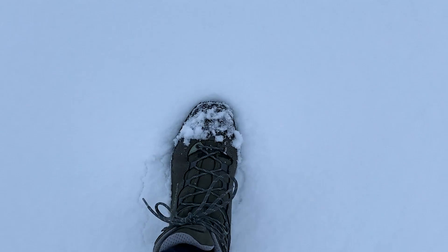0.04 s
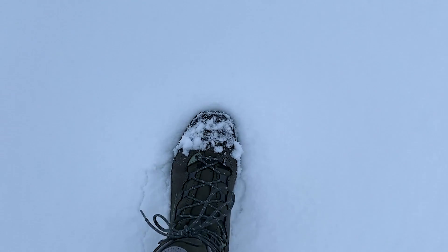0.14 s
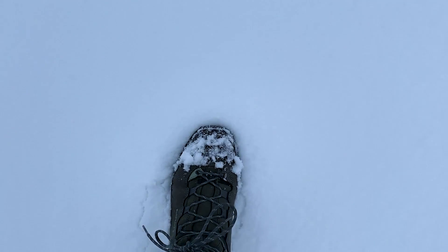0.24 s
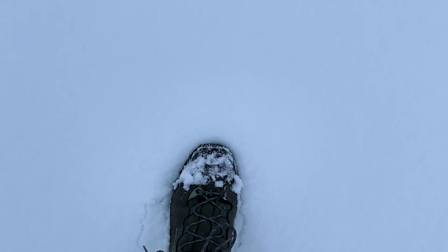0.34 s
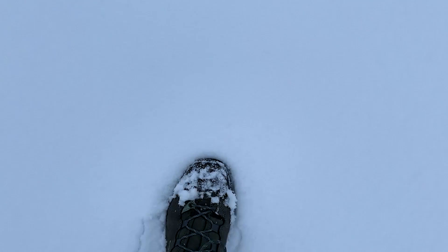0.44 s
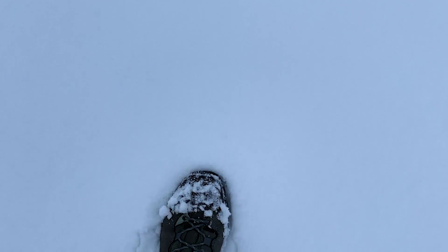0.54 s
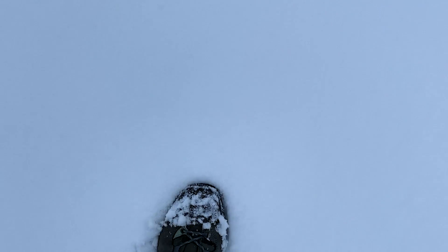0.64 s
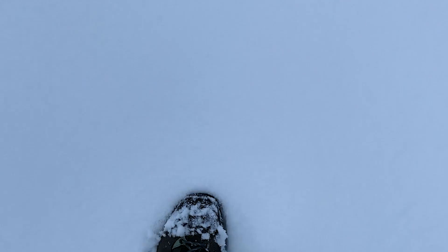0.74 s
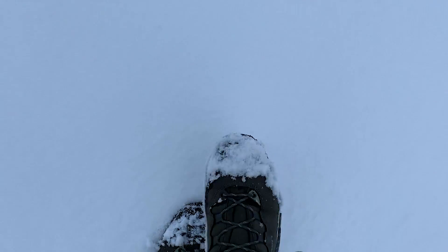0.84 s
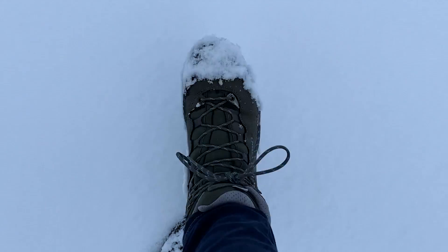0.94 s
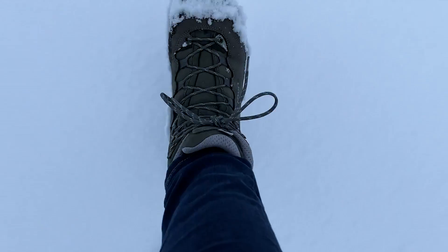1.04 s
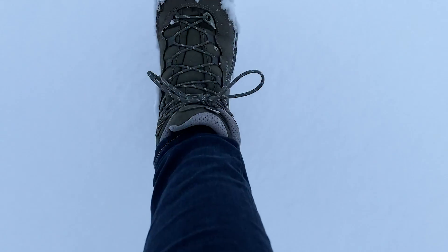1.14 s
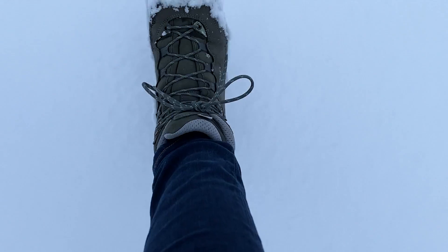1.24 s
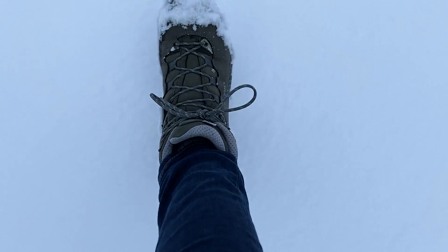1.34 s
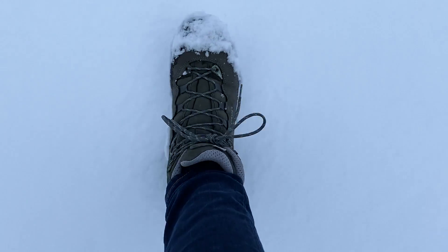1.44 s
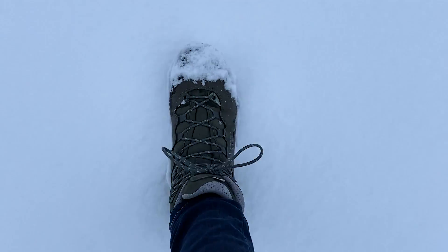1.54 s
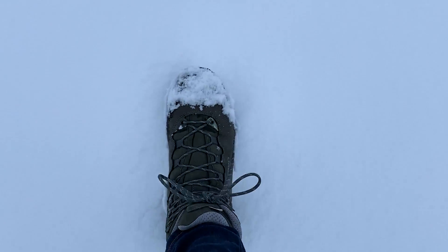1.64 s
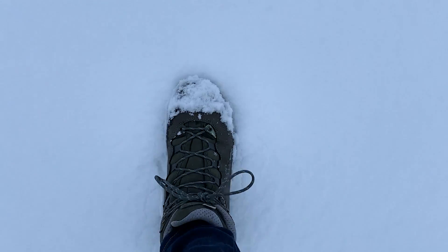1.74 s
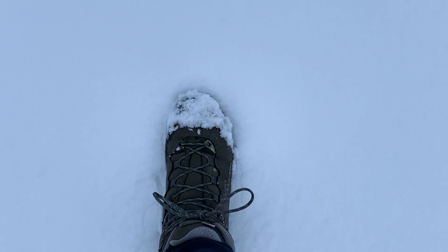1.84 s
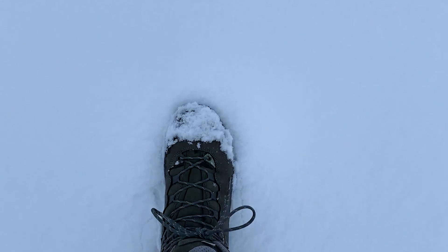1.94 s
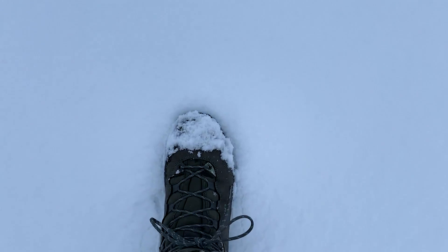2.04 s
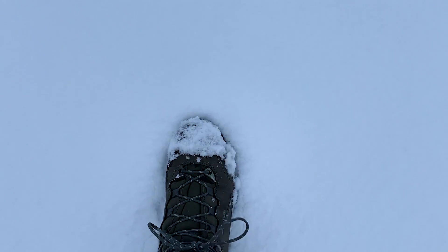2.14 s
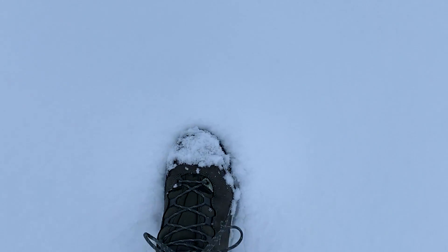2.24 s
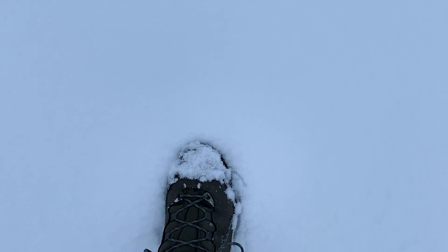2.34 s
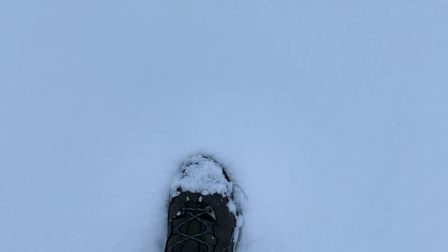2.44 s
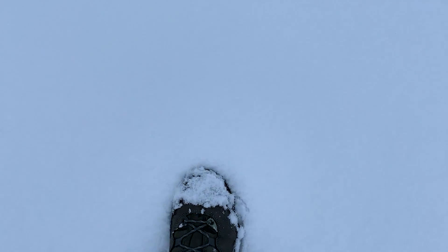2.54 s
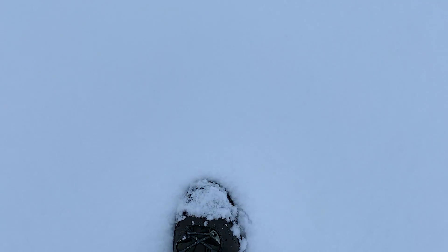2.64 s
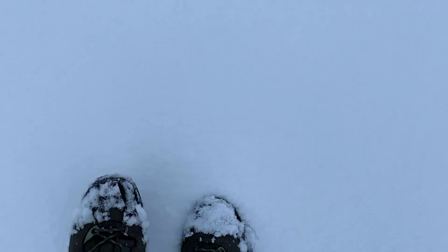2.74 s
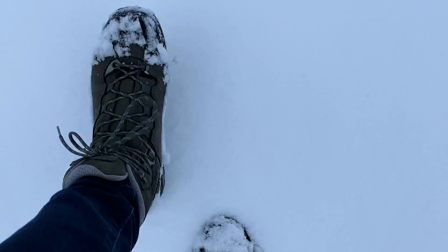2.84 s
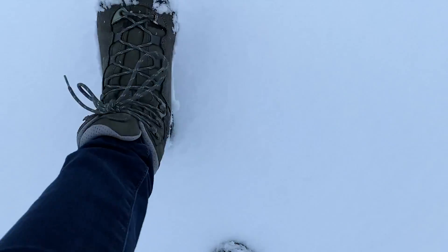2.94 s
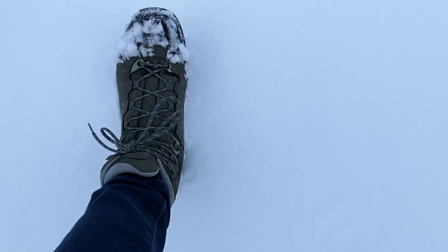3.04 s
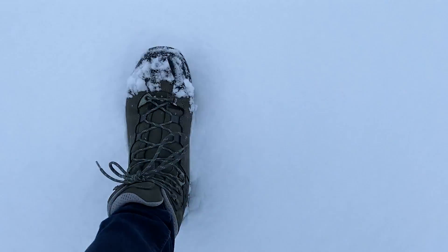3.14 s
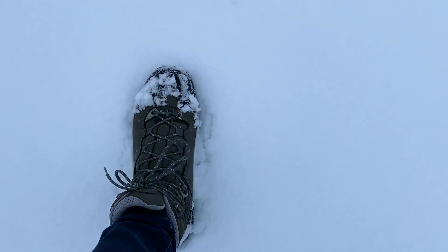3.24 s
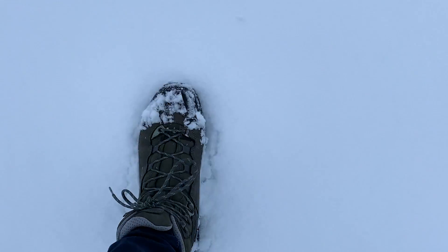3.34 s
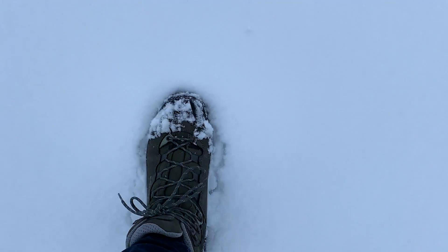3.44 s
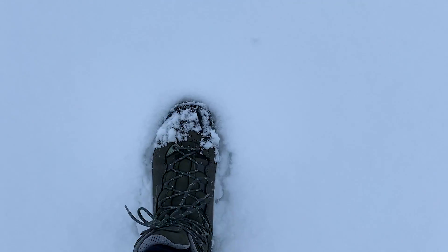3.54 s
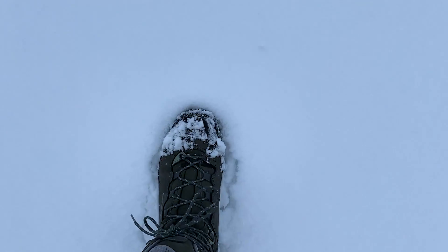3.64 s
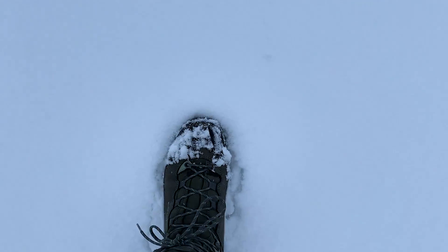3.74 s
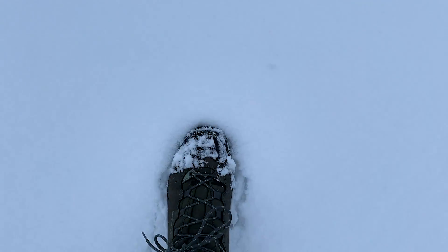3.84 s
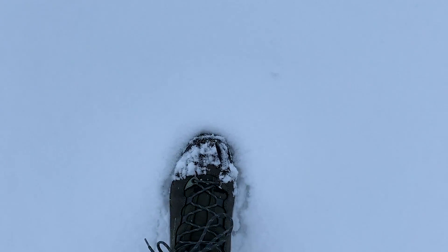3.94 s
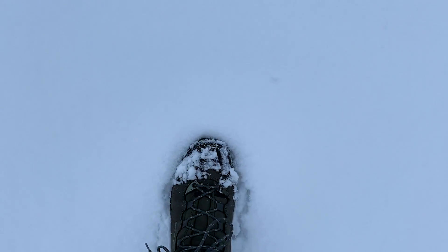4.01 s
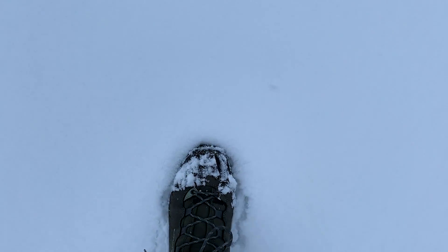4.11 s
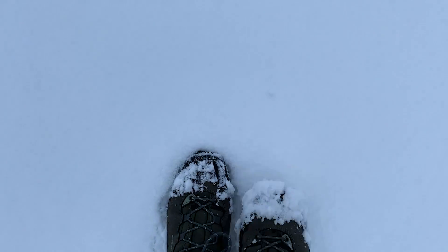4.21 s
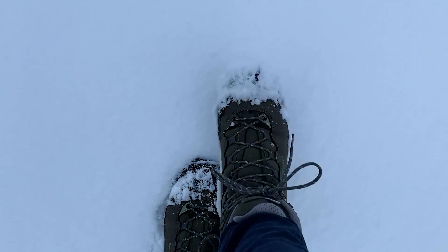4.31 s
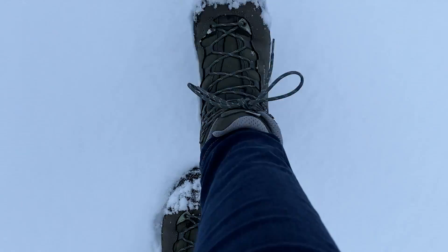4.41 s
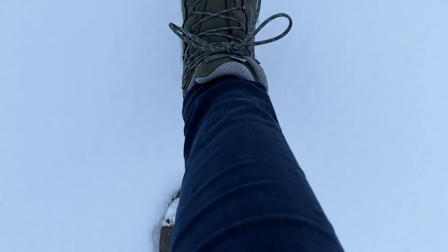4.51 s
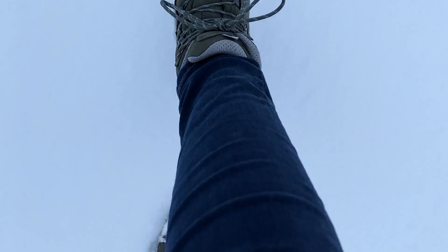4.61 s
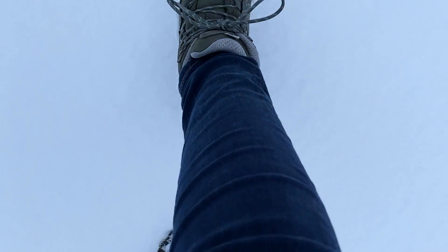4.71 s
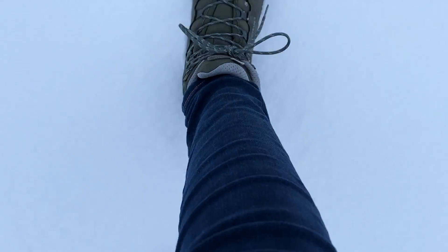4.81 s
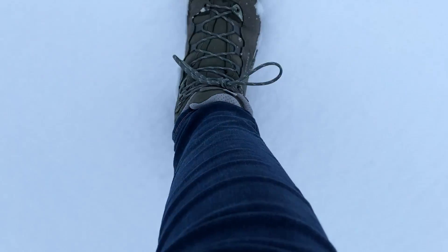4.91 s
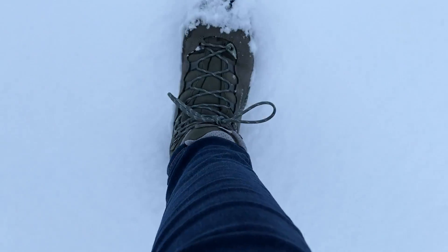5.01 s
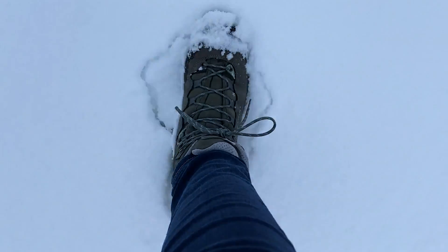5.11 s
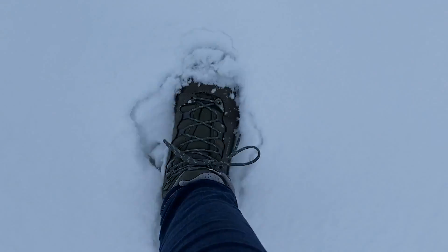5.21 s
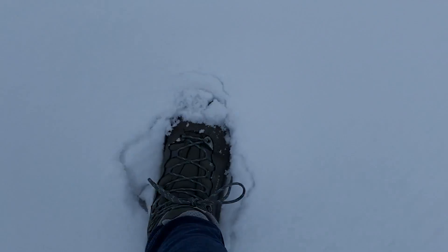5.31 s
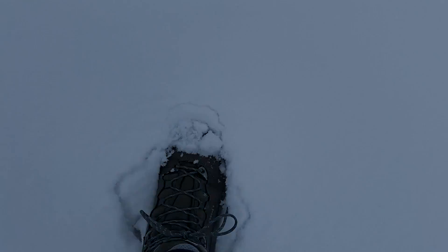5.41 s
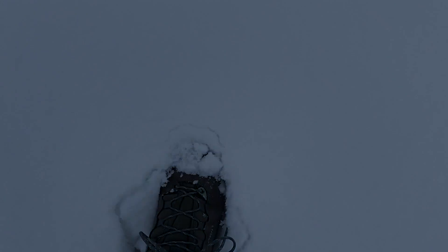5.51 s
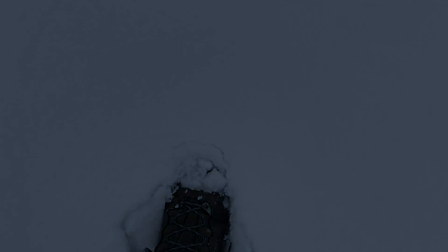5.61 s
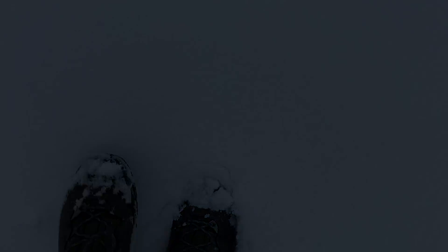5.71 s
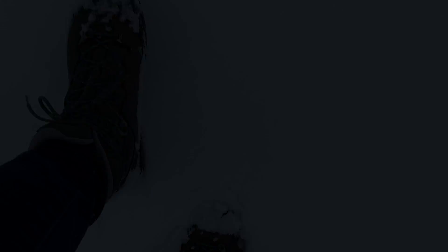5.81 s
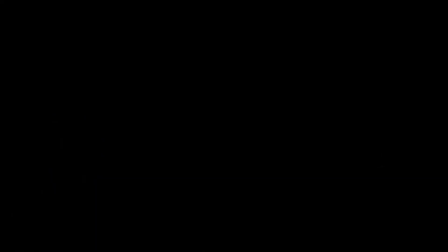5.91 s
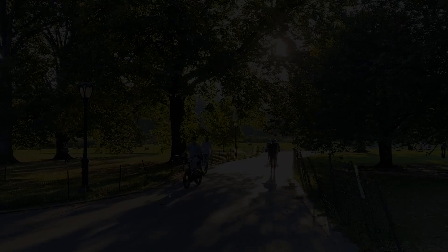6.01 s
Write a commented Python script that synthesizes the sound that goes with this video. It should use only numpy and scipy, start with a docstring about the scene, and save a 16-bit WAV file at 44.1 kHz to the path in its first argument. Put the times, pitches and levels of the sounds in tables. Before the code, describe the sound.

A quiet scuff leads to a sudden hard crack, then boots press into crusted snow in irregular crunching steps. Splintering ice, short gritty showers, brief squeaks and dull low thumps follow, densest around five seconds. Faint cloth rubbing and soft outdoor air fill the gaps. The sound is heard from just above the boots, wide and without echo, then fades away abruptly.

```python
"""Outdoors on snow under a frozen crust: boots walk, heard by the two ports of a phone held above them.
Each crack sends a bending wave through the crust, treble first and bass last, so it falls like a tiny chirp.
Freed shards and chips ring as decaying tones; crumbs crunch and buried snow packs as showers of random clicks.
Coarse grains make the scuff of a sole, fine ones the swish of a leg; behind lie a rush of open air,
made of coloured noise, and thin far whistles, made of wavering tones roughened by noise."""
import sys
import numpy as np
from scipy import signal
from scipy.fft import rfft, irfft
from scipy.io import wavfile
from scipy.ndimage import uniform_filter1d, minimum_filter1d

SR = 44100
rng = np.random.default_rng(int(sys.argv[2]) if len(sys.argv) > 2 else 0)


def inscribe(sig):
    """Save sig as 16-bit PCM at rate SR to the path in sys.argv[1].

    A 1-D sig is mono; a 2-D sig holds one channel per row.
    Samples are clipped to [-1, 1] before scaling.
    """
    pcm = np.round(np.clip(np.atleast_2d(sig).T, -1, 1) * 32767)
    wavfile.write(sys.argv[1], SR, pcm.astype(np.int16))


N = 267334
TIME = np.arange(N) / SR  # s
FREQ = np.maximum(np.fft.rfftfreq(N, 1 / SR), 1)  # Hz


def undb(db):
    """Decibels to gain."""
    return 10 ** (np.asarray(db) / 20)


def unit(x):
    """Scale to an rms of one."""
    return x / np.sqrt(np.mean(x ** 2))


def colour(points):
    """Gain at each frequency from (Hz, dB) points, falling steeply above the last."""
    hz, db = np.transpose(points)
    gain = undb(np.interp(np.log(FREQ), np.log(hz), db))
    return gain / np.maximum(FREQ / hz[-1], 1) ** 2


def bending(hz, lag, knee_hz=25):
    """Bending waves travel slower the lower they are: the delay is 100 * lag / (hz + knee_hz) seconds."""
    return np.exp(-2j * np.pi * lag * 100 * np.log(hz + knee_hz))


def spread(mid, side, width):
    """Left and right from a shared and an opposed part."""
    return mid + width * side * np.array([[1], [-1]])


def add(out, sound, start):
    """Mix a sound in at a time in seconds."""
    i = max(int(start * SR), 0)
    out[:, i:i + sound.shape[-1]] += sound[..., :max(N - i, 0)]


def wander(rate_hz):
    """A smooth random motion that turns about rate_hz times a second; rms one."""
    size = 16384
    coarse = np.linspace(0, N / SR, size)
    smoothing = np.exp(-(np.fft.rfftfreq(size, coarse[1]) / rate_hz) ** 2)
    motion = irfft(rfft(rng.standard_normal(size)) * smoothing)
    return np.interp(TIME, coarse, unit(motion))


def flicker(rate_hz, depth_db):
    """A random gain that wavers about rate_hz times a second; rms one."""
    return unit(undb(depth_db * np.clip(wander(rate_hz), -2, 2)))


def grains(rate, scatter_db, points, lag, width):
    """Tiny fractures at random moments, of uneven size, each swept by the crust; rms one."""
    happens = rng.random(N) < rate / SR
    size = undb(scatter_db * np.minimum(rng.exponential(size=N), 3))
    clicks = happens * size * rng.choice([-1, 1], N)
    ports = spread(clicks, clicks * rng.standard_normal(N), width)
    return unit(irfft(rfft(ports) * colour(points) * bending(FREQ, lag), N))


def burst_of_noise(size, decay_s, width):
    """Fading noise, partly different at each port, as a spectrum."""
    fade = np.exp(-np.arange(size) / SR / decay_s)
    noise = spread(*rng.standard_normal((2, size)), width)
    return rfft(noise * fade / np.sqrt(np.sum(fade ** 2)))


def crack(db, ring_hz, fall_db, thud_db, lag, rise_db=9, sole_hz=155, sole_octaves=0.65,
          splinter=0.61, splinter_s=0.0049, splinter_hz=1500, splinter_top_hz=4000,
          reach=22, width=0.58, lean=0.18, tick_db=-28):
    """One fracture: a broad ring with an overtone and a thud, swept downwards, trailed by splinters."""
    size, lead = 4096, 256  # samples
    hz = np.maximum(np.fft.rfftfreq(size, 1 / SR), 1)
    octave = np.log2(hz / ring_hz)
    # big, buried pieces ring low and lose their treble in the snow
    ring = 2 * undb(db) / (undb(-rise_db * octave) + undb(fall_db * octave))
    ring = ring / (1 + (hz / (reach * ring_hz)) ** 2)
    # the loose piece sings briefly in its second bending mode
    ratio, sharpness, boost = 2.7, 7, 1.1
    detune = hz / (ratio * ring_hz) - ratio * ring_hz / hz
    ring = ring * (1 + boost / (1 + 1j * sharpness * detune))
    # each piece has its own shape, so its higher modes stand out unevenly
    mode_gap_hz, uneven_db = 450, 6
    knots = np.arange(0, SR / 2, mode_gap_hz)
    uneven = np.interp(hz, knots, rng.uniform(-1.2, 1, len(knots)))
    ring = ring * undb(uneven_db * uneven * np.clip(octave, 0, 1))
    thud = undb(thud_db) * np.exp(-.5 * (np.log2(hz / sole_hz) / sole_octaves) ** 2)
    wave = (ring + thud) * SR / hz / (1 + (50 / hz) ** 4) * bending(hz, lag)
    # splinters rattle in the middle range, differently to each side; the snow muffles their top
    tail = burst_of_noise(size, splinter_s, width)
    middle = 2 / (hz / splinter_hz + splinter_hz / hz) / (1 + (hz / splinter_top_hz) ** 4)
    direct = spread(0.91, np.exp(2j * np.pi * rng.random()), lean)
    wave = wave * (direct + splinter * tail * middle)
    # thin surface pieces part with a glassy tick; thick buried ones do not
    tick_s, tick_hz, thin_hz = .0009, 7000, 550
    glassy = np.exp(-np.log2(hz / tick_hz) ** 2) / (1 + (thin_hz / ring_hz) ** 2)
    wave = wave + undb(db + tick_db) * glassy * SR / hz * burst_of_noise(size, tick_s, width)
    return np.roll(irfft(wave), lead, axis=1), lead / SR


# The loudest cracks, in the crust under the boots. Each row: start in seconds, relative level in dB,
# ring of the broken piece in Hz, fall above it in dB per octave, relative thud of the sole in dB.
CRUST_CRACKS = [(0.251, -27, 520, 12, -53), (0.3887, -16.5, 706, 8.5, -58), (0.4031, -15, 814, 20, -17),
                (0.419, -34.5, 695, -1, -22), (0.4277, -28, 410, 3, -49), (0.4783, -20, 1280, 19, -29.5),
                (0.4801, -4, 290, 22, -28.5), (0.4835, -22, 1300, 17, -31.5), (0.4871, -21.5, 291, 25, -16),
                (0.4965, -14, 283, 21, -14), (0.646, -21, 177, 15, -16), (.661, -18, 184, 14, -18),
                (0.711, -17, 100.4, 7.5, -54), (0.809, -15, 89, 35, -50), (0.876, -13.5, 150, 10, -50),
                (0.901, -12.5, 262, 21.5, -35.5), (0.986, -13, 296, 15, -31), (1.018, -18, 170, 19, -50),
                (1.034, -18, 171, 19, -50), (1.089, -24, 190, 21, -54), (1.134, -17, 201, 10.5, -51),
                (1.3069, -15, 300, 18, -49), (1.337, -13, 235, 17, -37), (1.5182, -11.5, 866, 17.5, -24),
                (1.5639, -21, 780, 5, -26), (1.709, -22.5, 550, 13, -44), (1.7495, -12.5, 500, 12, -17.5),
                (1.7624, -8.5, 557, 14.5, -21), (1.93, -37, 150.6, 23, -19), (2.146, -16.5, 386, 8.5, -15),
                (2.153, -25, 177, 3.5, -9), (2.2115, -19.5, 600, 16, -26), (2.237, -20, 173, 22, -51),
                (2.2747, -15, 930, 21, -12.5), (2.3495, -25, 700, 17, -33.5), (2.383, -28.5, 620, 20, -28),
                (2.4038, -12, 238, 14, -51), (2.421, -14, 790, 20, -33.5), (2.4234, -26, 1300, 10, -54),
                (2.442, -30, 1180, 14, -50), (2.4483, -13, 994, 10.5, -16.5), (2.4558, -18.5, 806, 8, -33),
                (2.4632, -15.5, 840, 15, -30.5), (2.474, -24, 680, 9, -32.5), (2.478, -29, 800, 19, -45),
                (2.513, -15, 159, 12, -41), (2.553, -16.5, 175, 15, -58), (2.566, -16, 122, 14, -48),
                (2.5969, -17, 373, 22, -41), (2.609, -14.5, 212, 22, -41), (2.647, -13.5, 137, 21, -57),
                (2.694, -16, 157, 18.5, -52), (2.727, -23.5, 250, 23.5, -55), (2.767, -23.5, 327, 21, -51),
                (2.7923, -23.5, 399, 19, -24), (2.798, -16.5, 190, 24, -40), (2.906, -22, 183, 15, -22),
                (3.021, -18, 178, 18, -37), (3.062, -48, 890, -5, -48), (3.0253, -26, 1505, 5, -36),
                (3.093, -23, 603, 17, -32), (3.133, -24, 1100, 12, -40), (3.2133, -27, 800, 12, -29),
                (3.2234, -9.5, 292, 14, -33.5), (3.231, -15.5, 227, 16, -30.5),
                (3.2433, -17.5, 1350, 21, -22.5), (3.2762, -13.5, 277, 16, -23),
                (3.426, -9.5, 289, 18, -35), (3.443, -14.5, 194, 8, -26), (3.5753, -14.5, 638, 8, -5),
                (3.648, -28, 484, 5.5, -20), (3.6551, -26.5, 622, 5, -16), (3.745, -45.5, 440, -1, -33),
                (3.791, -31.5, 203, 3, -29), (3.813, -19.5, 508, 11, -8), (3.8386, -17.5, 317, 9.5, -16),
                (3.978, -27.5, 170.6, 18, -11.5), (4.1727, -18.5, 330, 10, -27.5),
                (4.184, -24, 332, 18, -5), (4.228, -22.5, 177, 14.5, -10), (4.247, -9, 328, 24.5, -45),
                (4.363, -20, 171, 16, -51), (4.428, -33, 410, 16, -45), (4.655, -21.5, 120, 22, -55),
                (4.693, -10, 423, 11, -46), (4.7036, -10, 410, 15, -17), (4.7442, -29, 1110, 9, -24),
                (4.7543, -26, 1190, 10, -22), (4.7625, -29, 905, 9, -24.5), (4.823, -10.5, 492, 16, -17),
                (4.8293, -19, 694, 9.5, -11), (4.838, -14.5, 630, 15, -9), (4.865, -27, 173, 20, -12.5),
                (4.8802, -28, 1300, 5, -33), (4.8904, -12.5, 655, 11.5, -15.5), (4.904, -22, 900, 17, -33),
                (4.9164, -31, 1110, 10, -41), (4.9247, -23.5, 834, 9, -25), (4.9455, -26.5, 1080, 8, -22.5),
                (5.053, -43, 624, -2, -28), (5.0649, -18.5, 745, 12.5, -27.5), (5.072, -9, 205, 15.5, -15),
                (5.082, -9, 202, 17, -20), (5.108, -32, 170, 15, -4), (5.125, -8, 216, 35, -17),
                (5.155, -31, 436, 2.5, -8.5), (5.1535, -22.5, 860, 12, -29.5), (5.193, -24, 900, 9, -41),
                (5.2056, -26.5, 603, 7, -12), (5.212, -12.5, 213, 31, -48.5), (5.291, -12, 219, 25, -50),
                (5.243, -28, 2910, 15, -18.5), (5.27, -16.5, 1460, 16, -14.5),
                (5.285, -34, 680, -0.5, -13.5), (5.3272, -16.5, 820, 15, -22), (5.3388, -28, 2230, 21, -17),
                (5.406, -37, 698, 5.5, -45), (5.4643, -19.5, 506, 19, -59), (5.4696, -11.5, 399, 49, -52),
                (5.505, -27, 312, 4.5, -26.5)]


def crust():
    """Single cracks: bigger pieces lag more, and a heavy drop reaches deeper snow and lags more again."""
    lag_s, lag_at_hz, lag_slope = .012, 382.4, 0.2524  # lag of a piece ringing at lag_at_hz
    sink_lag_s = 0.01804  # extra lag at a thud of 0 dB
    out = np.zeros((2, N))
    for start, db, ring_hz, fall_db, thud_db in CRUST_CRACKS:
        lag = lag_s * (lag_at_hz / ring_hz) ** lag_slope + sink_lag_s * undb(thud_db)
        sound, lead = crack(db, ring_hz, fall_db, thud_db, lag)
        add(out, sound, start - lead)
    return out


# The sole squeaking on the crust. Each row: start in seconds, end in seconds, slips per second,
# relative level in dB, ring in Hz.
SOLE_SQUEAKS = [(1.246, 1.3, 130, -24, 335), (1.723, 1.751, 330, -15.5, 370), (3.261, 3.278, 276, -16, 320),
                (5.462, 5.471, 736, -20.5, 1500)]


def squeaks():
    """The sole slips and grips in quick runs, each slip a small crack at a slightly uneven moment."""
    out = np.zeros((2, N))
    for start, end, rate, db, ring_hz in SOLE_SQUEAKS:
        for slip in np.arange(start, end, 1 / rate):
            sound, lead = crack(db, ring_hz, fall_db=18.5, thud_db=-62.5, lag=0.00641)
            add(out, sound, slip - lead + 0.079 * rng.standard_normal() / rate)
    return out


def ping(hz, ring_s, lean=0.71):
    """A piece of ice rings, falling 60 dB in ring_s seconds, a little to one side."""
    t = TIME[:2048]
    attack = 1 - np.exp(-2 * hz * t)
    decay = np.exp(-np.log(1000) * t / ring_s)
    ring = attack * decay * np.sin(2 * np.pi * hz * t)
    return spread(ring, ring * rng.uniform(-1, 1), lean)


# Shards that a crack sets ringing for an instant. Each row: start in seconds, pitch in Hz,
# relative level in dB, time to fall 60 dB in seconds.
RINGING_SHARDS = [(.3896, 706, -2.5, 0.014), (0.3894, 1920, -14.5, 0.008), (0.389, 4200, -25.5, 0.0053),
                  (.3894, 6800, -15, 0.0012), (0.4018, 1740, -8.5, 0.0037), (.4186, 1870, -14.5, 0.0063),
                  (.419, 744, -5.5, 0.01), (0.4272, 1740, -23, .009), (0.4772, 1840, -14.5, 0.011),
                  (.4836, 1410, -14, .008), (0.499, 2230, -26, 0.0088), (1.5192, 1600, -3, 0.0029),
                  (1.5192, 3700, -19, 0.0028), (2.2118, 670, 4, 0.011), (2.2122, 1680, -11.5, 0.0079),
                  (2.2135, 2570, -23, 0.0047), (2.2764, 1360, -9, 0.0035), (2.2757, 2500, -6.5, 0.0034),
                  (2.2751, 3550, -25.5, 0.004), (2.4219, 1980, -3.5, 0.0037), (2.4494, 1380, -15, 0.0028),
                  (2.4553, 2450, -23, .005), (2.4638, 1160, -10.5, 0.01), (2.7917, 505, -17.5, 0.032),
                  (2.4488, 3400, -10.5, 0.0027), (3.5757, 776, 6, 0.0071), (3.5757, 1780, -14.5, 0.013),
                  (3.5757, 4150, -31, 0.0043), (3.649, 3700, -25, 0.0033), (3.656, 4400, -30, 0.0025),
                  (3.656, 710, -9.5, 0.0082), (3.8139, 2350, -15.5, .004), (3.8139, 780, -3.5, 0.0077),
                  (3.8395, 1660, -26, 0.0067), (4.8242, 820, -5, 0.017)]


def shards():
    """Each freed shard rings at its own pitch."""
    out = np.zeros((2, N))
    for start, hz, db, ring_s in RINGING_SHARDS:
        add(out, undb(db) * ping(hz, ring_s), start)
    return out


# Showers of ice crumbs around the soles. Each row: start in seconds, end in seconds,
# relative crunch in dB, relative glassy treble in dB.
CRUMB_SHOWERS = [(0.247, 0.262, -40, -70), (0.464, 0.497, -37.5, -60.5), (0.965, 0.981, -39, -52),
                 (1.345, 1.365, -30, -46.5), (1.374, 1.577, -45, -63), (1.552, 1.583, -26, -41.5),
                 (1.703, 1.801, -33.5, -54), (2.139, 2.163, -33, -49.5), (2.263, 2.279, -35, -56.5),
                 (2.433, 2.493, -38, -60.5), (3.016, 3.051, -27, -38), (3.022, 3.193, -38, -55.5),
                 (3.126, 3.146, -33, -44), (3.198, 3.272, -32.5, -52), (3.239, 3.256, -26.5, -40),
                 (3.266, 3.288, -25.5, -43), (3.425, 3.452, -33, -55.5), (3.575, 3.584, -38, -50),
                 (3.809, 3.818, -45, -50.5), (3.979, 3.99, -41.5, -51.5), (4.166, 4.191, -38, -66),
                 (4.386, 4.409, -39.5, -50), (4.688, 4.714, -39.5, -62.5), (4.742, 4.774, -35, -55),
                 (4.779, 4.946, -43.5, -65), (4.827, 4.841, -31, -45), (4.885, 4.894, -23.5, -36),
                 (5.039, 5.135, -33.5, -58), (5.128, 5.242, -32.5, -55), (5.272, 5.299, -30, -49.5),
                 (5.315, 5.316, -51.5, -48.5), (5.322, 5.336, -36, -43.5), (5.459, 5.469, -39, -41.5),
                 (5.876, 5.948, -43.5, -62.5)]
# Spectrum of the coarse crunch. Each row: frequency in Hz, relative level in dB.
CRUNCH_SPECTRUM = [(200, -8.5), (450, 1), (750, -1), (1500, -8), (2500, -12), (4000, -21), (7000, -36.5),
                   (12000, -46.5)]
# Spectrum of the fine, glassy grains. Each row: frequency in Hz, relative level in dB.
GLASS_SPECTRUM = [(1500, -59), (3500, 5.5), (5000, -0.5), (7000, 1), (9000, -7.5), (11500, -7),
                  (16000, -24.5)]


def crumbs(longest_edge_s=0.02, edge_share=0.37, coarse_db=-0.9, trickle_db=-11, trickle_s=0.031):
    """Showers of breaking ice grains swell and trail off as the boot sinks in or drags free."""
    crunch, glass = np.zeros(N), np.zeros(N)
    for start, end, db, treble_db in CRUMB_SHOWERS:
        centre = (start + end) / 2
        edge_s = min(longest_edge_s, edge_share * abs(end - start))
        corners = [start - edge_s, min(start + edge_s, centre), centre, max(end - edge_s, centre), end + edge_s]
        shower = np.interp(TIME, corners, [0.0041, 1.5, 1.8, 1.21, 0.0016])
        # loosened crumbs trickle on after each shower
        trickle = undb(trickle_db) * np.exp(-np.maximum(TIME - end, 0) / trickle_s)
        shower = np.maximum(shower, (TIME > centre) * trickle)
        crunch += (shower * undb(db)) ** 2
        glass += (shower * undb(treble_db)) ** 2
    coarse = grains(rate=1900, scatter_db=2.0, points=CRUNCH_SPECTRUM, lag=0.004996, width=0.35)
    fine = grains(rate=9700, scatter_db=6.0, points=GLASS_SPECTRUM, lag=0.00303, width=0.56)
    # one breaking grain overloads its neighbours, so they go in little avalanches
    avalanches = flicker(rate_hz=140, depth_db=3.3)
    return avalanches * (undb(coarse_db) * np.sqrt(crunch) * coarse + np.sqrt(glass) * fine)


def chips(chips_per_s=110, chip_db=7.5, chip_hz=2020, ring_s=0.0035):
    """Bigger chips snap at uneven moments in each shower; the smaller ones ring higher, shorter and softer."""
    scatter_db, scatter_octaves, fall_db_per_octave = 7, 1.4, 5  # scatter is the most either way
    out = np.zeros((2, N))
    for start, end, db, _ in CRUMB_SHOWERS:
        count = max(round((end - start) * chips_per_s), 1)
        for moment, size, pitch in rng.uniform(-1, 1, (count, 3)):
            octave = scatter_octaves * pitch
            peak_db = db + chip_db + scatter_db * size - fall_db_per_octave * octave
            sound = ping(chip_hz * 2 ** octave, ring_s / 2 ** (octave / 2))
            add(out, undb(peak_db) * sound, (start + end + moment * (end - start)) / 2)
    return out


# A boot bearing down on the snow. Each row: start in seconds, end in seconds,
# level of the deep thuds in dB, level of the creak in dB.
BOOT_PRESSES = [(0.632, 0.74, -18.5, -28.5), (0.762, 0.933, -20, -32), (0.995, 1.214, -21, -31),
                (1.227, 1.368, -25, -26.5), (1.523, 1.593, -23.5, -32.5), (1.748, 1.798, -18, -26),
                (1.905, 1.997, -23.5, -31), (2.114, 2.273, -18.5, -26.5), (2.41, 2.682, -22, -29),
                (2.718, 2.931, -25.5, -36), (3.018, 3.307, -21.5, -27), (3.552, 4.098, -27, -33),
                (4.156, 4.436, -24.5, -47), (4.65, 4.78, -20, -30), (4.808, 4.883, -12, -27),
                (4.925, 5.041, -23.5, -45), (5.068, 5.231, -16, -23), (5.276, 5.339, -18, -29.5),
                (5.48, 5.716, -27.5, -57), (5.746, 5.946, -35.5, -57)]
# Spectrum of the deep thuds. Each row: frequency in Hz, relative level in dB.
THUD_SPECTRUM = [(20, -34), (35, -13.5), (55, 5.5), (75, 5.5), (130, -1.5), (200, -7.5), (300, -25.5),
                 (600, -62)]
# Spectrum of the creak. Each row: frequency in Hz, relative level in dB.
CREAK_SPECTRUM = [(120, -25), (220, 1.5), (320, 5.5), (450, -15), (700, -19), (1200, -40), (3000, -66)]


def packing(attack_s=0.0059, release_s=0.032):
    """Buried layers give way in many small, muffled steps while the weight comes on, holds and lifts."""
    # the snow keeps settling between presses, then the settling dies away
    fade_start_s, fade_db_per_s = 5.43, 30
    standing = undb(-fade_db_per_s * np.maximum(TIME - fade_start_s, 0))
    thud, creak = standing * undb(-32.5), standing * undb(-38)
    for start, end, thud_db, creak_db in BOOT_PRESSES:
        load = np.clip((TIME - start) / attack_s, 0, 1)
        weight = load * np.exp(-np.maximum(TIME - end, 0) / release_s)
        thud = np.maximum(thud, weight * undb(thud_db))
        creak = np.maximum(creak, weight * undb(creak_db))
    thuds = grains(rate=400, scatter_db=1.5, points=THUD_SPECTRUM, lag=.014, width=0.21)
    creaks = grains(rate=260, scatter_db=5.5, points=CREAK_SPECTRUM, lag=.016, width=0.15)
    # the snow holds and yields in turn
    lumps = flicker(rate_hz=16, depth_db=2.5)
    return thuds * thud + creaks * creak * lumps


def small_cracks(cracks_per_s=14, above_creak_db=4, typical_hz=282, scatter_db=1.5, scatter_octaves=0.35):
    """Buried bits of crust snap at uneven moments during each press, louder as it creaks more."""
    out = np.zeros((2, N))
    for start, end, _, creak_db in BOOT_PRESSES:
        count = max(round((end - start) * cracks_per_s), 1)
        moments = start + (end - start) * (np.arange(count) + rng.random(count)) / count
        for moment, (size, pitch) in zip(moments, rng.standard_normal((count, 2))):
            db = creak_db + above_creak_db + scatter_db * size
            ring_hz = typical_hz * 2 ** (scatter_octaves * pitch)
            sound, lead = crack(db, ring_hz, fall_db=26.0, thud_db=-37.0, lag=.016)
            add(out, sound, moment - lead)
    return out


def rubbing(strokes, points, rate, scatter_db, width):
    """Friction of many tiny grains swells and fades with each stroke."""
    swing = np.zeros(N)
    for start, end, db in strokes:
        swing += undb(db) * np.sin(np.pi * np.clip((TIME - start) / (end - start), 0, 1))
    return swing * grains(rate=rate, scatter_db=scatter_db, points=points, lag=0, width=width)


# A sole scuffing through loose snow. Each row: start in seconds, end in seconds, level at mid-stroke in dB.
SOLE_SCUFFS = [(-.05, .36, -44), (1.14, 1.45, -39), (1.36, 1.56, -41.5), (2.48, 2.64, -41),
               (4.52, 4.72, -46.5)]
# Spectrum of a scuff. Each row: frequency in Hz, relative level in dB.
SCUFF_SPECTRUM = [(250, -21), (450, -1), (600, 4), (800, 0.5), (1100, -14), (1800, -25), (3000, -44.5)]


def scuffs():
    """A sole drags through loose snow: coarse, sparse grains."""
    return rubbing(SOLE_SCUFFS, SCUFF_SPECTRUM, rate=700, scatter_db=3.0, width=.4)


# Soft swishes as a leg swings through, probably trouser cloth. Each row: start in seconds,
# end in seconds, level at mid-stroke in dB.
LEG_SWISHES = [(-.12, .14, -54.5), (0.6, 0.842, -49), (2.56, 2.783, -52), (2.9, 3.035, -56.5),
               (4.128, 4.337, -52.5), (4.468, 4.682, -59.5), (4.904, 5.08, -52), (5.337, 5.5, -57),
               (5.55, 5.777, -53.5)]
# Spectrum of a swish. Each row: frequency in Hz, relative level in dB.
SWISH_SPECTRUM = [(600, -16.5), (1500, 4.5), (2500, 0), (4500, -7.5), (7000, -16.5), (9000, -23.5),
                  (12000, -31.5)]


def swishes():
    """Cloth rubs as a leg swings: fine, dense grains."""
    return rubbing(LEG_SWISHES, SWISH_SPECTRUM, rate=15000, scatter_db=5.0, width=.79)


# Open air all around, dying away towards the end. Each row: time in seconds, level in dB.
AIR_LEVEL = [(0, -32), (1.2, -33.5), (1.9, -34.5), (2.65, -33.5), (4.05, -33), (4.55, -36), (5.35, -32),
             (5.8, -45.5), (5.95, -50), (6.06, -44.5)]
# Spectrum of the air. Each row: frequency in Hz, relative level in dB.
AIR_SPECTRUM = [(20, 12), (60, 9.5), (300, 10), (480, 1.5), (780, -3), (1200, -8.5), (2200, -18),
                (3200, -30), (5000, -36), (7500, -41.5), (9500, -49.5), (16000, -58)]


def air(width=0.92):
    """The soft rush of the open air: coloured noise, wavering a little."""
    noise = spread(*rng.standard_normal((2, N)), width)
    rush = unit(irfft(rfft(noise) * colour(AIR_SPECTRUM), N))
    rush = rush * flicker(rate_hz=13.0, depth_db=-0.8)
    return rush * undb(np.interp(TIME, *np.transpose(AIR_LEVEL)))


# Thin whistles far off, perhaps birds. Each row: start in seconds, end in seconds, pitch in Hz,
# arch of the pitch in Hz, relative level in dB.
FAR_WHISTLES = [(.36, .88, 3070, 20, -67), (.47, .76, 2985, 15, -66), (3.895, 4.17, 3075, 55, -62),
                (4.08, 4.32, 2920, 40, -70), (0, .16, 1600, 0, -59), (.2, .73, 1603, 4, -56.5),
                (5.28, 5.48, 1612, 0, -54), (5.46, 5.69, 1612, 0, -60), (5.73, 5.86, 1608, 0, -62.5)]


def whistles(waver=.004, flutter_db=3, rough=.75):
    """Thin far whistles, steady or arched, rough and wavering in pitch and strength on their way."""
    out = np.zeros(N)
    drift, flutter = wander(rate_hz=60), flicker(rate_hz=25, depth_db=flutter_db)
    for start, end, hz, arch_hz, db in FAR_WHISTLES:
        on = (TIME > start) & (TIME < end)
        arch = np.sin(np.pi * (TIME[on] - start) / (end - start))
        # higher whistles waver more
        pitch = (hz + arch_hz * arch) * (1 + waver * (hz / 2000) ** 2 * drift[on])
        phase = 2 * np.pi * np.cumsum(pitch) / SR
        # a narrow band of noise around the pitch roughens the tone
        band = wander(rate_hz=14 * (hz / 1000) ** 2)[on]
        tone = np.sqrt(1 - rough ** 2) * np.sin(phase) + rough * band * np.cos(phase)
        out[on] += undb(db) * np.sqrt(2 * arch) * flutter[on] * tone
    return out


def scene():
    """Snow swallows all echoes, so everything arrives dry."""
    ice = crust() + squeaks() + shards() + crumbs() + chips()
    snow = packing() + small_cracks()
    return ice + snow + scuffs() + swishes() + air() + whistles()


# The two microphone ports of the phone. Each row: frequency in Hz, phase of left ahead of right in radians.
PORT_PHASE_LEAD = [(0, 0), (7000, -.1), (9100, -3.14), (11300, -6.3), (13500, -9.4), (16400, -13.5)]
# The whole sound drops out near the end and starts to creep back. Each row: time in seconds, gain in dB.
LEVEL_DROPOUT = [(5.95, 0), (5.976, -5), (5.982, -40), (6.02, -28), (6.06, -9)]


def record(dry):
    """The two ports part in phase in the treble; the phone limits the peaks and cuts the top."""
    turn = np.exp(.5j * np.interp(FREQ, *np.transpose(PORT_PHASE_LEAD)))
    ports = irfft(rfft(dry) * np.array([turn, 1 / turn]), N)
    # a fast limiter holds the loudest swings under the ceiling
    ceiling, top_hz = .72, 16200
    gain = np.minimum(1, ceiling / (np.abs(ports).max(axis=0) + 1e-9))
    gain = uniform_filter1d(minimum_filter1d(gain, size=120), size=120)
    level = undb(np.interp(TIME, *np.transpose(LEVEL_DROPOUT)))
    lowpass = signal.ellip(8, .2, 70, top_hz, fs=SR, output="sos")
    return signal.sosfilt(lowpass, ports * gain * level)


dry = scene()
out = record(dry)
inscribe(out)
```